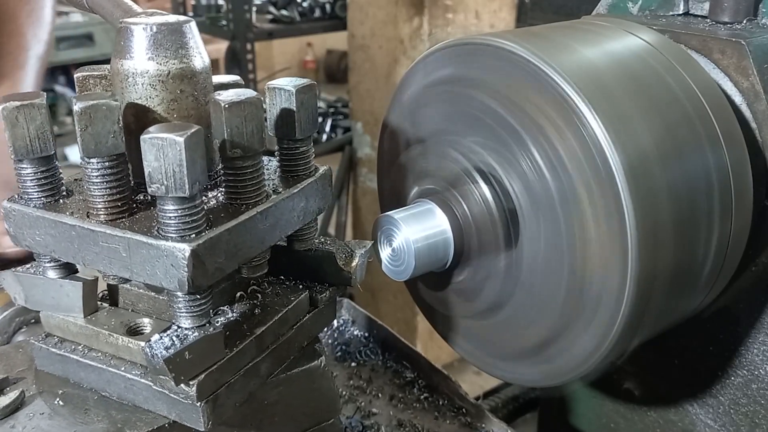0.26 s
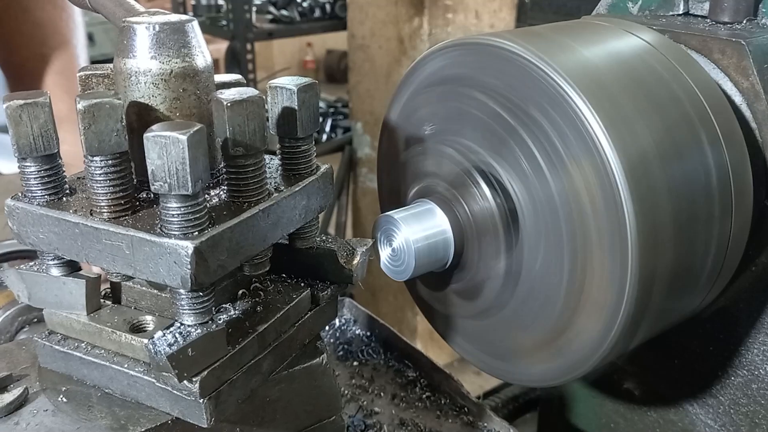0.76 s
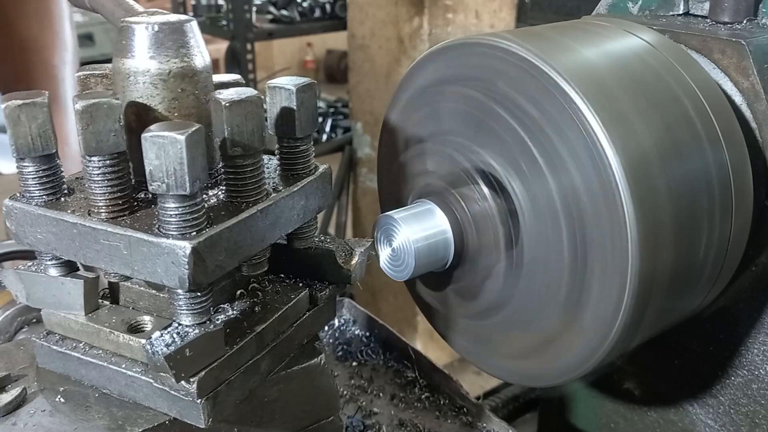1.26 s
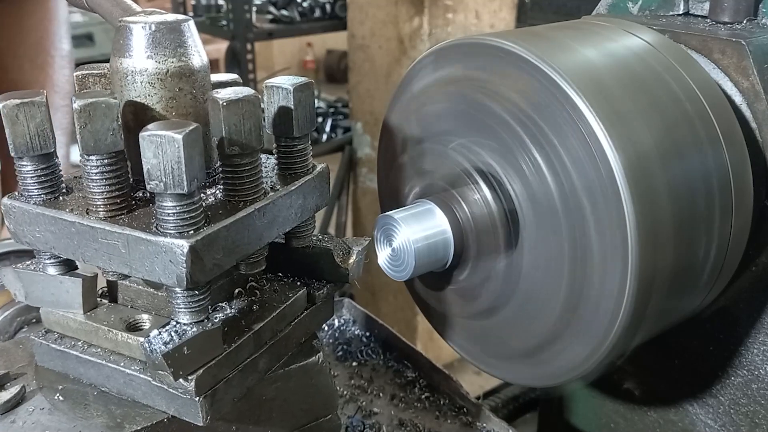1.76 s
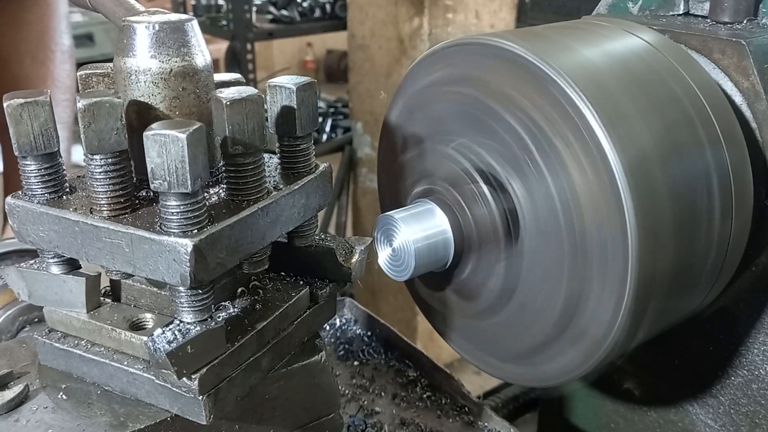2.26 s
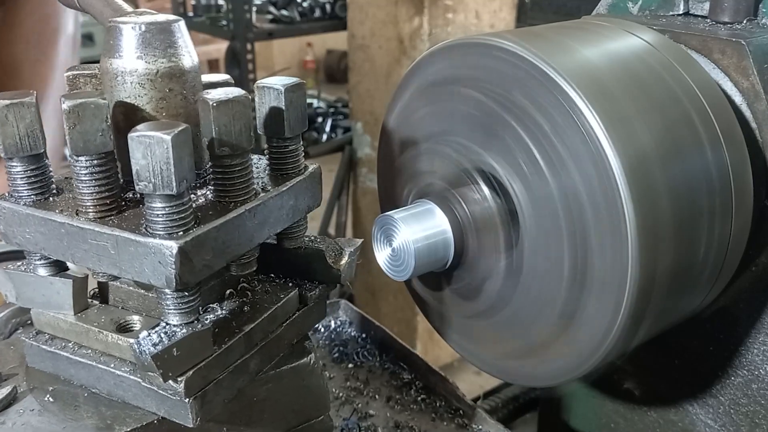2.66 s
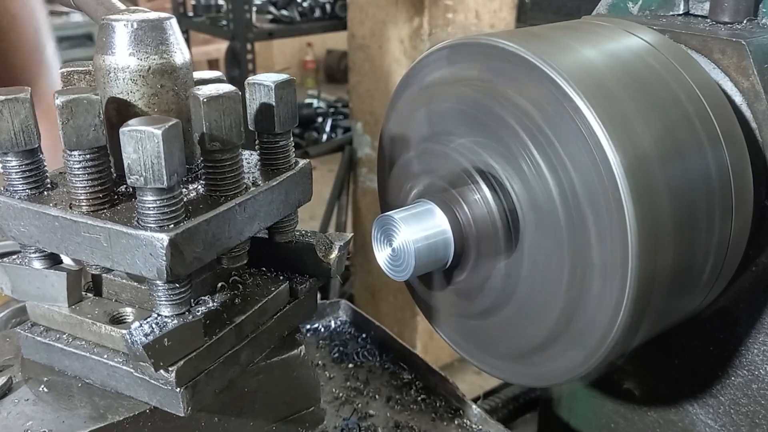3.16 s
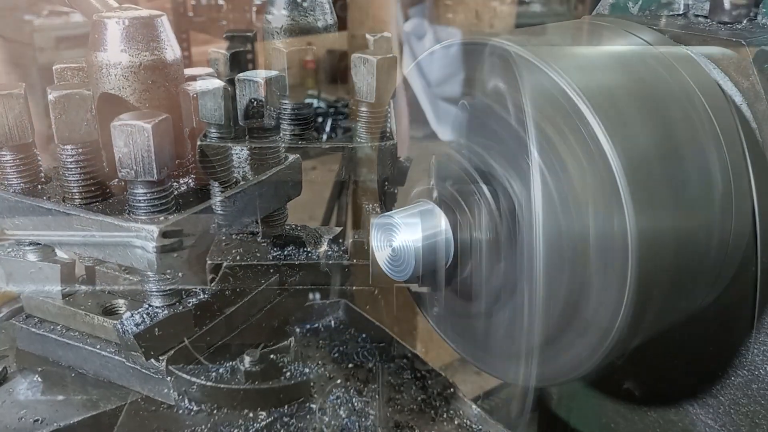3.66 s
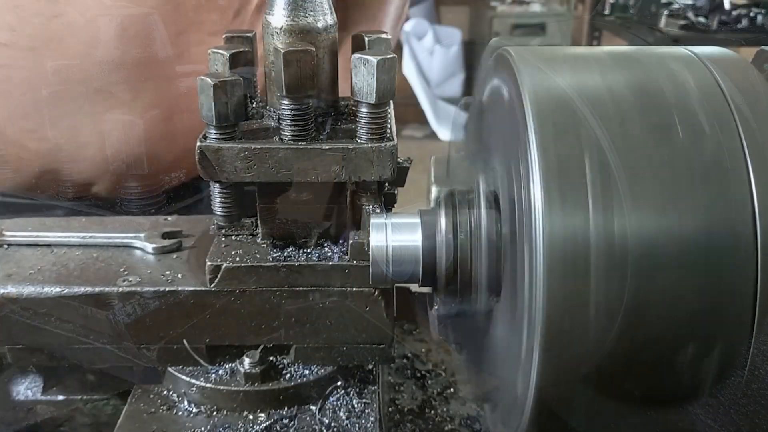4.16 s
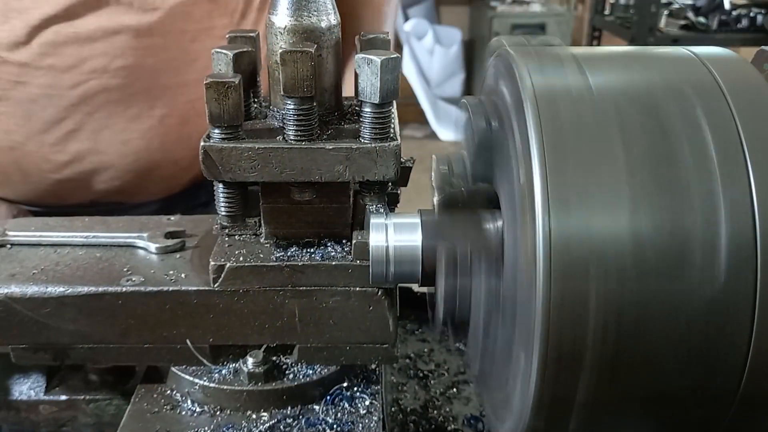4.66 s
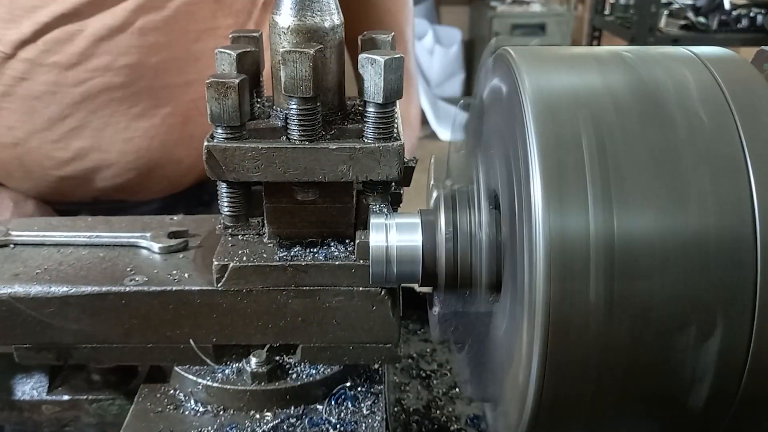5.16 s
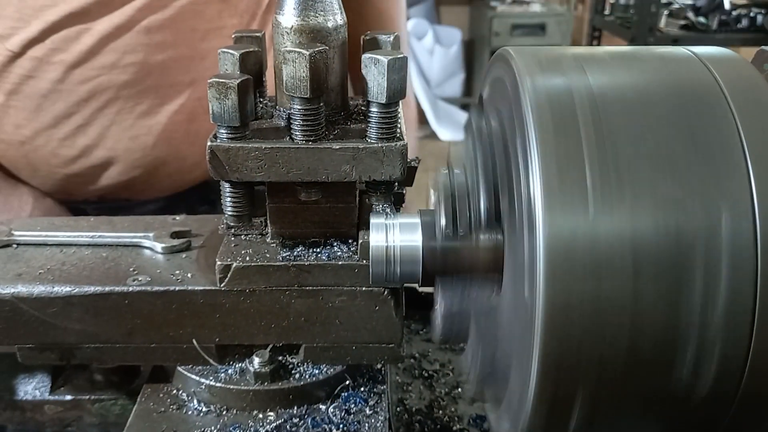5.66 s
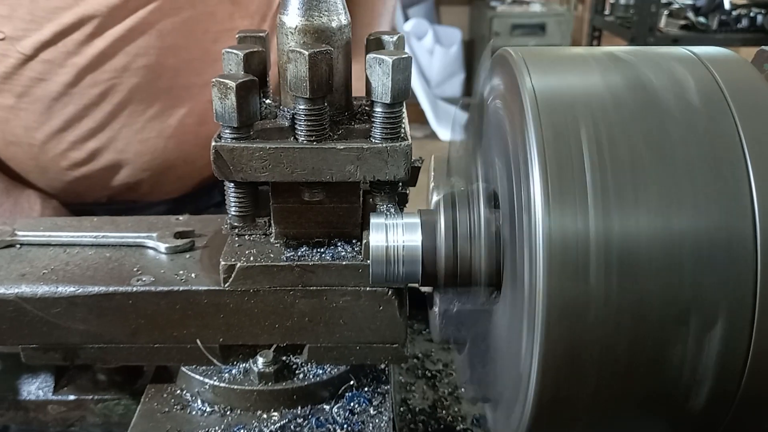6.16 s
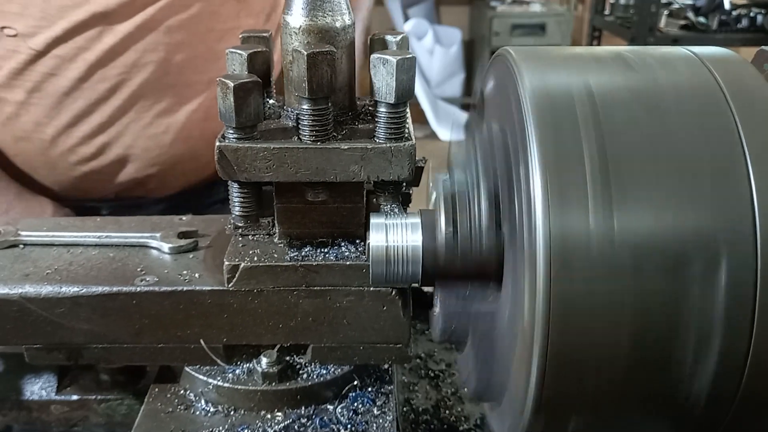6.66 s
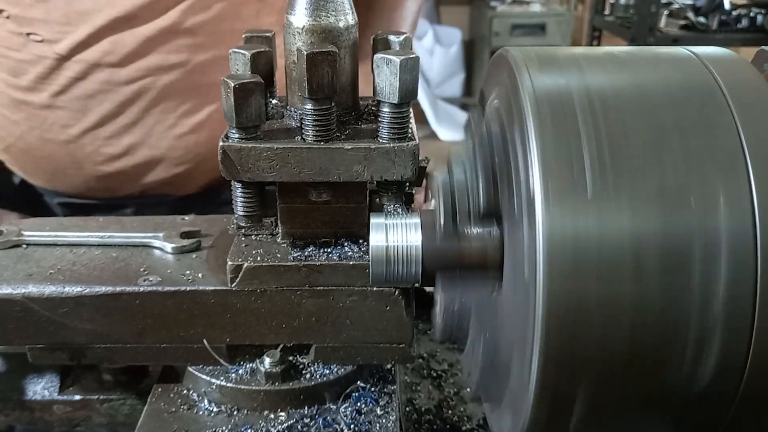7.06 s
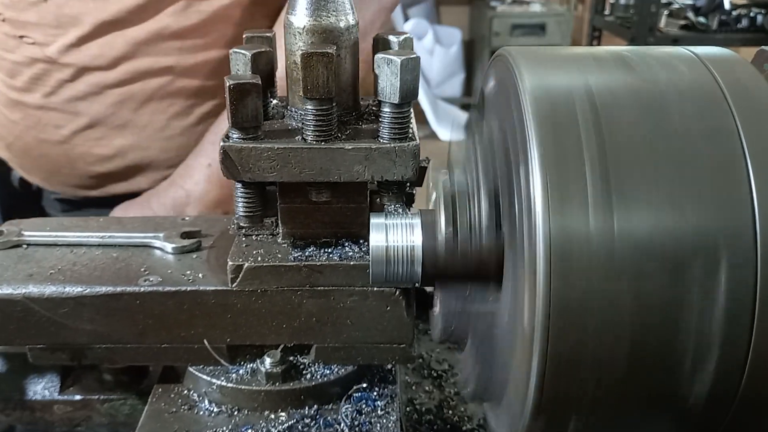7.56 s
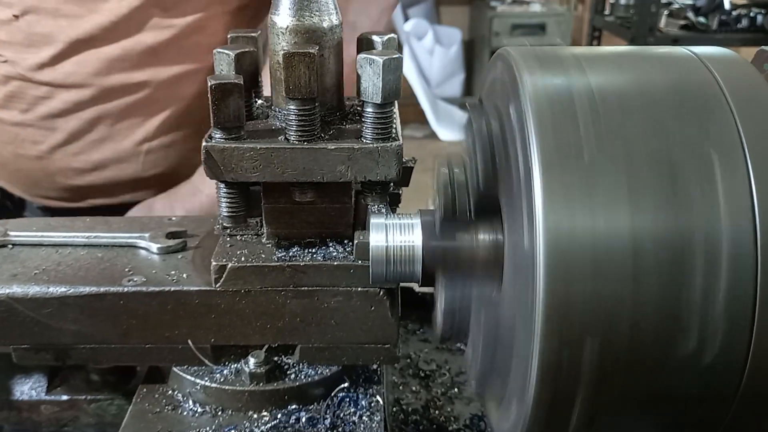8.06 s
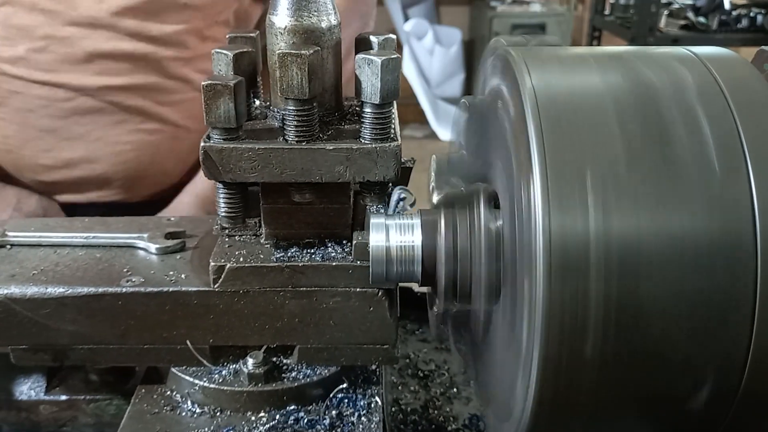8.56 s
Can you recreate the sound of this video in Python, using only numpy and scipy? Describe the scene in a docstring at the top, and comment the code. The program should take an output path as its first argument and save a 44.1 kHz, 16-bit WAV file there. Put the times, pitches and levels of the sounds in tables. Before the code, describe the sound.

From 0 to 3.8 seconds, a lathe is heard across its bed in a workshop: a steady, slightly wavering motor and gear drone, with bright squeaky chirps rising and dipping in a pattern repeating about three times a second, stronger on the left, over a faint whistle. Soft hiss fades at the start and swells around 1.2 and 2.3; small knocks fall near 0.1, 1.3, 2.6 and 3.4. At 3.8 the sound switches abruptly to beside the chuck. Over airy spindle idling and faint gear hum, the tool scrapes with a ringing, squealing chatter until 4.45, then in short bursts around 4.9, 5.4, 5.9, 6.35 and 6.75. Gusts and low puffs buffet the microphone, mainly left, until about 7.4. A longer cut at 7.1 to 7.4 has crisp chip snaps; light nicks and weak scraping follow, then strong, throbbing chatter from 8.4 to the end.

```python
"""A motor drones across a workshop while a toothed drive chirps on every lap; a far hiss comes and goes.
Then, from beside the lathe chuck, the tool is fed in and out of the turning work. It scrapes, chatters
on the marks of its last turn, and gusts of air buffet the microphone ports over the idling spindle.
Drone, hiss, idling, scrape and gusts are coloured noise; chirp, hum and chatter are noise through
resonances, partly steadied; puffs are short tones with rasp."""
import sys
import numpy as np
from scipy import signal
from scipy.io import wavfile
from scipy.ndimage import uniform_filter1d

SR = 44100
rng = np.random.default_rng(int(sys.argv[2]) if len(sys.argv) > 2 else 0)


def dump_mix(stems):
    """Bounce the given channels to the path in sys.argv[1] as a 16-bit WAV at rate SR."""
    frames = np.atleast_2d(stems).T  # one column per channel
    limited = np.clip(frames, -1, 1)  # hard clip at full scale
    pcm = np.round(limited * 32767).astype(np.int16)
    wavfile.write(sys.argv[1], SR, pcm)


N = 388080

T = np.arange(N) / SR
STEPS = np.arange(0, N + 64, 64) / SR  # times in s at which slow levels are worked out

# Likeness of the two ports beside the chuck: pitch_hz, likeness (0-1)
NEAR_LIKENESS = [(300, 0.9), (1600, 0.98), (3500, 0.43), (6000, 0.33), (11000, 0.49), (16000, .2)]
# Phase between the ports: pitch_hz, left_lead_radians
NEAR_PHASE = [(300, 0), (3190, -.3), (5000, -1.2), (6720, -2.8), (10000, -3.2), (11500, -4), (12700, -5.8),
              (16000, -6)]
# Balance between the ports: pitch_hz, left_over_right_db
NEAR_BALANCE = [(300, -1.5), (1600, -0.5), (3500, -2.5), (6000, -2), (11000, -1.5)]
# Brief touches of the tool: start_s, level_db, chatter_db
NICKS = [(7.138, -41.5, -54), (7.631, -44, -54), (7.79, -37.5, -52), (7.9259, -40, -44), (8.0286, -50, -54),
         (8.14, -49, -50), (8.356, -54, -35.5)]


def gain_of(db):
    """Amplitude factor of a level in dB."""
    return 10 ** (np.asarray(db) / 20)


def evened(x):
    """The signal brought to an RMS of 1."""
    return x / np.sqrt(np.mean(x ** 2) + 1e-20)


def read(points, hz):
    """A table over pitch, joined by straight lines on a log scale."""
    f, value = np.transpose(points)
    return np.interp(np.log(hz + 1), np.log(f + 1), value)


def curve(rows, t=T):
    """All columns of a table, joined by straight lines in time."""
    s, *columns = np.transpose(rows)
    return [np.interp(t, s, c) for c in columns]


def filled(level):
    """A slow level at every sample."""
    return np.array([np.interp(T, STEPS, row) for row in np.atleast_2d(level)])


def resonate(x, hz, width):
    """A resonance of gain 1: one complex pole; a moving pitch is shifted to zero, smoothed, shifted back."""
    r = np.exp(-np.pi * width / SR)
    if np.ndim(hz) == 0:
        return 2 * signal.lfilter([1 - r], [1, -r * np.exp(2j * np.pi * hz / SR)], x).real
    turn = np.exp(2j * np.pi * np.cumsum(hz) / SR)
    return 2 * (turn * signal.lfilter([1 - r], [1, -r], x * turn.conj())).real


def resonate_twice(x, hz, width):
    """Two equal resonances in a row, for steeper sides; width is that of each."""
    return resonate(resonate(x, hz, width), hz, width)


def steadied(x, share, size):
    """A self-sustained oscillation holds its size: part of the swelling and fading is taken out."""
    power = uniform_filter1d(x ** 2, size)
    return evened(x / (abs(power) + 0.033 * np.var(x)) ** (np.clip(share, 0, 1) / 2))


def panned(x, pan_db):
    """Left and right, with left stronger by pan_db."""
    return x * gain_of(np.array([[.5], [-.5]]) * pan_db)


def noise(colour, modes=(), modes_db=0, same=((1, 0), (2, 0)), phase=((1, 0), (2, 0)),
          balance=((1, 0), (2, 0)), patchy_db=2.5, size=2048):
    """Stereo noise from random short-time spectra: a colour, resonant humps on it, drifting patches."""
    hz = np.fft.rfftfreq(size, 1 / SR)
    a, b, c, d, patches = rng.standard_normal((4 * N // size + 5, len(hz), 5)).T
    patches = uniform_filter1d(patches, size=12, axis=0)  # over pitch
    patches = evened(uniform_filter1d(patches, size=6, axis=1))  # over time
    humps = sum(gain_of(2 * (db + modes_db)) / (1 + (2 * (hz - f) / width) ** 2) for f, width, db in modes)

    like = np.clip(read(same, hz), -1, 1)[:, None]
    right = a + 1j * b
    left = like * right + np.sqrt(1 - like ** 2) * (c + 1j * d)
    left = left * (np.exp(1j * read(phase, hz)) * gain_of(read(balance, hz)))[:, None]

    shape = gain_of(read(colour, hz)) * np.sqrt(1 + humps)
    spectra = np.array([left, right]) * shape[:, None] * gain_of(patchy_db * patches)
    sound = signal.istft(spectra, nperseg=size, noverlap=3 * size // 4)[1]
    return evened(sound[:, :N])


def bumps(rows, rise_s):
    """One rounded envelope at each (start_s, peak_db), with its peak rise_s after the start."""
    out = np.zeros((len(rows), N))
    for envelope, (s, db) in zip(out, rows):
        part = slice(int(np.ceil(s * SR)), int((s + 20 * rise_s) * SR))
        u = (T[part] - s) / rise_s
        envelope[part] = gain_of(db) * u * np.exp(1 - u)
    return out


def swell_db(start, top, end, db, rise_s, fall_s, start_db, end_db, rest_db):
    """Level in dB through five points: rest, start, top, end, rest; past the last point it is at rest."""
    times = [start - rise_s, start, top, end, end + fall_s]
    return np.interp(STEPS, times, [rest_db, db + start_db, db, db + end_db, rest_db])


def drone():
    """Motor and gears from across the bed: noise with humming casings, its bass wavering in level."""
    # Colour before levelling: pitch_hz, level_db per Hz
    drone_colour = [(25, -38), (45, -22), (60, -7.5), (100, -1.5), (170, -7), (250, -4), (500, -3.5),
                    (900, -5), (1460, -6.5), (1900, -5.5), (2500, -5.5), (3800, -8.5), (4420, -11),
                    (6720, -14.5), (7400, -28), (11700, -24.5), (16000, -29.5)]
    # Casings that hum, dB against each other: pitch_hz, width_hz, level_db
    casings = [(142.7, 6.3, -5), (204.6, 19, 0), (317.4, 7.2, 0.5), (416.4, 5.6, -0.5), (488, 16, -6),
               (764, 48, -11), (851, 16, -4.5), (1026, 20, -4), (3880, 76, -7)]
    # Likeness of left and right: pitch_hz, likeness (0-1)
    likeness = [(60, 0.82), (150, 1), (400, 0.84), (950, 0.047), (2400, 0.076), (6000, 0.23), (15000, 0.02)]
    # Slow course of the bass, on which the waver rides: time_s, change_db
    bass_course = [(0, 0.5), (.8, -2.5), (.92, 0.5), (2.0, -0.5), (2.12, 4), (2.7, 1), (3.2, -1.5),
                   (3.8, 1)]
    level_db, waver_db = -42.5, 1.3
    sound = gain_of(level_db) * noise(drone_colour, casings, 11.4, likeness, patchy_db=1.85, size=4096,
                                      balance=[(100, -1.4), (2000, -1.1), (6000, -1.0)])
    bass = signal.sosfiltfilt(signal.butter(2, 350, fs=SR, output="sos"), sound)
    waver = evened(uniform_filter1d(rng.standard_normal(N), size=3000))
    return sound + bass * (gain_of(curve(bass_course)[0] + waver_db * waver) - 1)


def toothed_drive():
    """Each tooth gives a short squeak near a pitch and level that repeat every lap, over a lower whistle."""
    # Upper chirp over one lap, before the cover colours it: time_in_lap_s, pitch_hz, level_db
    chirp_lap = [(0, 3880, -62), (.055, 3800, -57), (.075, 3800, -47.5), (.095, 3480, -43.5),
                 (.115, 3140, -49.5), (.14, 3030, -44), (.155, 3480, -54.5), (.18, 3690, -51),
                 (.205, 3430, -46.5), (.225, 3440, -74), (.25, 3800, -58), (.275, 3800, -45.5),
                 (.3, 3860, -50.5), (.3212, 3850, -57)]
    # Lower whistle over one lap: time_in_lap_s, pitch_hz, level_db
    whistle_lap = [(0, 2020, -51), (.05, 1980, -49.5), (.1, 1860, -52.5), (.17, 1860, -58),
                   (.21, 1900, -56.5), (.26, 2010, -50), (.3212, 2070, -48.5)]
    # Cover of the drive, dB against the chirp put through each: pitch_hz, width_hz, level_db
    cover = [(3060, 160, -5), (3425, 104, -2.5), (3786, 83, 3.5), (3920, 130, -4.5)]
    lap_s, teeth = .3212, 22

    hz, db = curve(chirp_lap, T % lap_s)
    tooth = T / lap_s * teeth - .3
    nearest = np.round(tooth)
    stray, strength = rng.standard_normal((2, int(N / SR * 70) + 2))[:, nearest.astype(int)]
    hz = hz * (1 + 0.02 * stray - 0.062 * (tooth - nearest))  # each squeak falls as the tooth seats
    squeaks = (0.4 + np.exp(2.1 * (np.cos(2 * np.pi * tooth) - 1))) * gain_of(0.67 * strength)

    a, b, c, d = rng.standard_normal((4, N))
    chirp = []
    for source in (a, a + 0.49 * b):  # left and right share most of it
        ringing = steadied(resonate_twice(source, hz, 410), share=0.32, size=400)
        bare = evened(ringing * squeaks) * gain_of(db)
        covered = sum(gain_of(mode_db) * resonate(bare, f, width) for f, width, mode_db in cover)
        chirp.append(.5 * bare + covered)

    hz, db = curve(whistle_lap, T % lap_s)
    whistle = [steadied(resonate_twice(source, hz, 140), share=0.45, size=600) * gain_of(db)
               for source in (c, c + 6.9 * d)]  # left and right share little of it
    return panned(np.add(chirp, whistle), -7.5)


def far_hiss():
    """Coloured noise in the distance that rises, climbs and falls away."""
    # Spells of hiss: start_s, loudest_s, fade_s, level_db
    spells = [(-.2, .04, 0.11, -42.5), (0.867, 1.18, 1.265, -42.5), (2.04, 2.32, 2.56, -43)]
    # Colour before levelling: pitch_hz, level_db per Hz
    hiss_colour = [(2000, -13.5), (4000, -4), (5200, -8), (6800, -10), (7300, -21.5), (11000, -21.5),
                   (16000, -34)]
    # Resonant humps: pitch_hz, width_hz, level_db against the colour
    hiss_modes = [(5870, 200, 9), (11250, 170, 9)]
    levels = [swell_db(*row, rise_s=0.051, fall_s=0.15, start_db=-6.5, end_db=-2.5, rest_db=-59.5)
              for row in spells]
    return filled(gain_of(np.max(levels, axis=0))) * noise(hiss_colour, hiss_modes, patchy_db=2.0, size=1024)


def knocks():
    """Small knocks: a resonant thud and a bright tick, each noise under a rounded envelope."""
    # Knocks: start_s, thud_db, tick_db
    knock_rows = [(0.127, -42.5, -62), (1.294, -40.5, -69), (2.554, -38.5, -63), (2.583, -43.5, -64),
                  (3.357, -42.5, -74)]
    s, thud_db, tick_db = np.transpose(knock_rows)
    a, b = rng.standard_normal((2, N))
    thuds = evened(resonate(a, 610, 360)) * sum(bumps(np.transpose([s, thud_db]), 0.0085))
    ticks = evened(np.diff(b, 2, prepend=[0, 0])) * sum(bumps(np.transpose([s, tick_db]), .003))
    return thuds + ticks


def idling():
    """Spindle, gears and fan close by: noise with resonant humps."""
    # Colour before levelling: pitch_hz, level_db per Hz
    idle_colour = [(18, -68), (30, -31), (199, -33.5), (426, -15.5), (666, -6), (962, -15.5), (1810, -15.5),
                   (2060, -3.5), (2350, -15.5), (5040, -13), (6900, -13.5), (14800, -17.5), (16000, -23)]
    # Resonant humps, dB against each other: pitch_hz, width_hz, level_db
    idle_modes = [(336.6, 7, 5.5), (893, 21, -4.5), (1291, 24, 4), (1490, 23, -29), (1640, 35, -24),
                  (2026, 75, -3.5), (2530, 21, 2.5), (2920, 140, 0), (3297, 55, 3.5), (4110, 26, -1),
                  (4950, 49, 1.5), (5380, 21, 5), (5710, 51, 1)]
    # The idling eases after the start and dips briefly: time_s, change_db
    idle_course = [(3.8, 4.5), (4.2, 2.5), (4.6, -0.5), (4.63, -1), (4.68, 3), (6.9, -1), (7.6, 1),
                   (8.8, 2.5)]
    base_db = -49.5
    sound = noise(idle_colour, idle_modes, 11.3, NEAR_LIKENESS, NEAR_PHASE, NEAR_BALANCE, size=4096)
    return gain_of(base_db + curve(idle_course)[0]) * sound


def gear_hum():
    """A wavering hum of the gears: noise through a narrow resonance, partly steadied."""
    # Course of the hum: time_s, level_db
    hum_course = [(3.8, -62), (4.9, -64), (5.0, -52), (5.15, -64), (5.35, -50), (5.65, -67), (5.8, -50),
                  (6.07, -59), (6.93, -60), (6.97, -63), (7.5, -58.5), (7.85, -51.5), (8.3, -50.5),
                  (8.8, -55)]
    hum = steadied(resonate_twice(rng.standard_normal(N), 647.0, 30), share=0.34, size=700)
    return panned(hum * gain_of(curve(hum_course)[0]), -0.96)


def feed(touch, full, withdraw, stops, scrape_db, chatter_db, built_db, lower_db, overtone_db):
    """Levels of scrape, chatter, lower mode, overtone: chatter goes to its built level, lower mode fades."""
    # Scrape in dB against full depth: approach, touch, built up, withdraw, lifted
    scrape_steps = (-17, -9.5, -1.5, -3, -29.5)
    approach_s, build_s, lift_s = 0.044, 0.18, 0.084
    fade_db_per_s, most_fade_db = 64, 19
    built = min(full + build_s, (full + 3 * min(withdraw, stops)) / 4)
    s = np.array([touch - approach_s, touch, full, built, withdraw, withdraw + lift_s])
    late = s + (stops - withdraw) * (s >= withdraw)  # the chatter has its own stop
    scrape = scrape_db + np.insert(np.array(scrape_steps), 2, 0)
    chatter = np.array([chatter_db - 38, chatter_db - 19.5, chatter_db, built_db, built_db, built_db - 34.5])
    lower = chatter + lower_db - np.clip(fade_db_per_s * (s - full), 0, most_fade_db)
    ringing = [np.interp(STEPS, late, db, -120, -120) for db in (chatter, lower, chatter + overtone_db)]
    return [np.interp(STEPS, s, scrape, -120, -120)] + ringing


def spindle():
    """Turns made so far, and how far the high side of the work faces the tool (-1 to 1)."""
    # Load slows the spindle: time_s, turns_per_s
    speed = [(3.8, 33.0), (4.0, 32.75), (4.4, 32.4), (4.7, 33.0), (5.05, 32.7), (5.25, 33), (5.55, 32.6),
             (5.75, 33), (7.1, 33.1), (7.4, 33), (8.35, 33), (8.55, 32.4), (8.8, 31.7)]
    high_spot_s = 8.731  # a moment when the high side meets the tool
    turns = np.cumsum(curve(speed)[0]) / SR
    return turns, np.cos(2 * np.pi * (turns - turns[round(high_spot_s * SR)]))


def tool_scrape(high_side):
    """Scrape of the tool at an even level: noise that throbs once a turn and breaks up with the chips."""
    # Colour before levelling: pitch_hz, level_db per Hz
    scrape_colour = [(290, -53), (500, -18), (631, -9.5), (750, -19), (1050, -19), (1640, -1), (1840, -9),
                     (2540, -4.5), (9220, -14), (14700, -18), (16000, -15.5)]
    # Resonances of the tool, dB against each other: pitch_hz, width_hz, level_db
    tool_modes = [(588, 51, 5), (957, 47, 7), (1178, 22, 7), (1890, 116, 0), (2300, 45, -1), (2543, 36, 0),
                  (4400, 60, -8), (5100, 97, 0), (5500, 59, -1.5), (6360, 57, 4)]
    grit = evened(uniform_filter1d(rng.standard_normal(N), size=200))  # chips break unevenly
    throb = gain_of(0.71 * high_side + 1.66 * grit)
    sound = noise(scrape_colour, tool_modes, 6.9, NEAR_LIKENESS, NEAR_PHASE, NEAR_BALANCE,
                  patchy_db=2.0, size=1024)
    return sound * evened(throb)


def surface(turns, memory, count=1400):
    """Roughness met by the tool: each turn keeps a share of the marks left by the turn before."""
    fresh = rng.standard_normal((int(N / SR * 36), count))
    marks = signal.lfilter([1], [1, -np.clip(memory, 0, .97)], fresh, axis=0).ravel()
    return evened(np.interp(turns * count, np.arange(len(marks)), marks))


def shank_chatter(turns, high_side, chatter_db, lower_db, overtone_db):
    """The marks of the last turn set the tool shank ringing in two close modes and an overtone."""
    # The work runs off centre: time_s, depth (0-1) of the throb in each turn
    runout = [(3.8, 0.1), (4.2, 0), (4.5, 0.4), (8.4, 0.08), (8.6, 0.55), (8.8, 1)]
    marks = surface(turns, memory=0.77)
    depth = np.clip(curve(runout)[0], 0, 1)
    upper = steadied(resonate_twice(marks, 1636, 34), share=.85, size=900)
    upper = upper * (1 + depth * high_side) / np.sqrt(1 + depth ** 2 / 2)
    upper = upper + 0.2 * evened(resonate(marks, 1730, 23))
    lower = steadied(resonate_twice(marks, 1515, 90), share=0.42, size=2600)
    post = evened(resonate_twice(marks, 1166, 55))  # the tool post rings along with the lower mode
    overtone = steadied(resonate_twice(marks, 3196, 150), share=0.34, size=900)
    overtone = overtone * (1 + 0.49 * depth * high_side)

    struck = sum(bumps([(s, db) for s, _, db in NICKS], 0.023))  # each nick sets the shank ringing
    chatter = (gain_of(chatter_db) + struck) * upper
    chatter = chatter + (gain_of(lower_db) + 0.42 * struck) * (lower + 0.32 * post)
    chatter = chatter + gain_of(overtone_db) * overtone
    # A faint copy 170 samples later, opposite in sign left and right, widens the chatter
    spread = 0.14 * np.roll(chatter, 170) * [[1], [-1]]
    return panned(chatter, -0.29) + spread


def tool_nicks(scrape):
    """Brief touches of the tool: the scrape through a broad resonance, under rounded envelopes."""
    return sum(bumps([row[:2] for row in NICKS], 0.0091)) * evened(resonate(scrape, 1100, 2000))


def chip_snaps(scrape):
    """Chips snap with a bright hiss: the scrape run backwards and brightened, in short bursts."""
    # Snaps: start_s, level_db
    chips = [(7.1355, -42), (7.1774, -41), (7.2353, -41), (7.3296, -42), (7.3595, -38), (7.3934, -40),
             (7.4782, -41), (8.25, -44), (8.3333, -42)]
    return sum(bumps(chips, 0.004)) * evened(np.diff(scrape[:, ::-1], prepend=0))


def cutting():
    """The tool fed in and out of the work: scrape, chatter, nicks and snapping chips."""
    # Feeds: touch_s, full_depth_s, withdraw_s, chatter_stops_s, scrape_db, chatter_db at full depth,
    # built_chatter_db, lower_mode_db and overtone_db against the chatter
    feeds = [(3.855, 4.04, 4.44, 4.455, -36.5, -39.5, -35, 1.5, -13),
             (4.73, 4.884, 5.03, 5.025, -37, -41, -41, 3.5, -14),
             (5.26, 5.38, 5.54, 5.555, -37.5, -39.5, -40.5, 2.5, -12),
             (5.76, 5.868, 5.99, 5.99, -37, -39.5, -42, 4.5, -9.5),
             (6.208, 6.34, 6.41, 6.41, -35, -37.5, -41, -4.5, -9.5),
             (6.608, 6.767, 6.81, 6.815, -38, -38, -40.5, -1.5, -12),
             (7.048, 7.135, 7.435, 7.385, -39.7, -40, -37, -1.5, -16),
             (7.46, 7.485, 7.52, 7.52, -41, -44, -47, -0.5, -12),
             (7.57, 7.803, 8.27, 8.1, -46.5, -56, -55, 4, -5),
             (8.334, 8.464, 8.85, 8.81, -37.5, -38.5, -36.5, -3, -6)]
    clear_db = -57.5  # the scrape level never goes below this, even with the tool clear
    scrape_db, *ringing_db = filled(np.max([feed(*row) for row in feeds], axis=0))
    turns, high_side = spindle()
    scrape = tool_scrape(high_side)
    chatter = shank_chatter(turns, high_side, *ringing_db)
    scraping = gain_of(np.maximum(scrape_db, clear_db)) * scrape
    return scraping + tool_nicks(scrape) + chip_snaps(scrape) + chatter


def gusts():
    """Lumpy air noise, unrelated at the two ports; gusts swell and sag, or are cut short while rising."""
    # Points of each gust's level curve before the bass cut:
    # rise_point_s, top_point_s, end_point_s, top_level_db, left_over_right_db.
    # The level is at rest from 36 ms after the end point on; where the end point lies early,
    # the gust is cut short before its top, or is not heard at all.
    gust_rows = [(3.95, 4.04, 3.9, -50, 11), (4.126, 4.148, 4.14, -50.5, 21),
                 (4.236, 4.473, 4.555, -43, 13), (4.584, 4.593, 4.6, -45, 23),
                 (4.665, 4.907, 4.935, -43.5, 10.5), (5.0, 5.11, 5.02, -54.5, 21),
                 (5.265, 5.4, 5.5, -53, 2), (5.794, 5.843, 5.7, -49.5, 12), (6.275, 6.37, 6.41, -42.5, 7),
                 (6.5, 6.862, 6.895, -47.5, 18), (7.02, 7.057, 6.9, -45.5, -5),
                 (7.11, 7.15, 7.37, -49.5, 0)]
    # Colour before levelling: pitch_hz, level_db per Hz
    gust_colour = [(60, -49), (180, -48), (280, -15.5), (400, -5), (520, 2), (800, -6.5), (1200, -12.5),
                   (2500, -39)]
    calm_db = -78
    lumps = gain_of(2.7 * evened(uniform_filter1d(rng.standard_normal((2, N)), size=350)))
    air = evened(noise(gust_colour, size=512) * lumps)
    strength = gain_of(calm_db)
    for *row, pan_db in gust_rows:
        level_db = swell_db(*row, rise_s=0.063, fall_s=0.036, start_db=-7, end_db=-1, rest_db=-100)
        strength = strength + panned(gain_of(level_db), pan_db)
    return filled(strength) * air


def puffs():
    """Sudden puffs at the ports: a short low tone with rasping noise on it."""
    # Puffs before the bass cut: start_s, level_db, pitch_hz, rasp_db against the tone, left_over_right_db
    pops = [(4.024, -41, 524, -6, 9), (4.255, -43, 522, -12, 17), (4.423, -38, 500, -13.5, 4.0),
            (4.496, -36.5, 637, -9.5, 12), (4.517, -39, 560, -10, 13), (4.532, -38, 540, -10, 13),
            (4.583, -41.5, 566, -11.5, 23), (4.778, -37.5, 553, -13.5, 14), (4.913, -43, 484, -11, 7.5),
            (5.083, -45, 600, -4, 18), (5.094, -40, 570, -7, 22), (5.114, -45, 465, -10, 20),
            (6.503, -37, 520, -12, 24.5), (6.556, -41.5, 519, -6, 18), (6.603, -39.5, 527, -17, 23),
            (6.647, -38, 514, -9, 21.5), (6.849, -39, 530, -5.5, 14.5), (6.88, -31, 508, -12.5, 19),
            (7.048, -45.5, 506.4, -10, -11), (7.444, -41.5, 500, -8, -9)]
    out = np.zeros((2, N))
    rasp = rng.standard_normal(N)
    rasp = evened(resonate(rasp, 910, 517) + 0.4 * resonate(rasp, 2300, 900))
    envelopes = bumps([row[:2] for row in pops], 0.0029)
    for (s, _, hz, rasp_db, pan_db), bump in zip(pops, envelopes):
        part = slice(int(s * SR), int((s + .06) * SR))
        tone = np.sin(2 * np.pi * hz * (T[part] - s))
        out[:, part] += panned(bump[part] * (tone + gain_of(rasp_db) * rasp[part]), pan_db)
    return out


def buffeting():
    """Gusts and puffs at the microphone, which cuts their bass below 230 Hz."""
    bass_cut = signal.butter(3, 230, "high", fs=SR, output="sos")
    return signal.sosfilt(bass_cut, gusts() + puffs())


def scene():
    """First from across the bed, then from beside the chuck."""
    move_s = 3.801  # the listening place changes, within 2 ms
    near = np.clip((T - move_s) / .002, 0, 1)
    across_the_bed = drone() + toothed_drive() + far_hiss() + knocks()
    beside_the_chuck = idling() + gear_hum() + cutting() + buffeting()
    return (1 - near) * across_the_bed + near * beside_the_chuck


def record(dry):
    """The band limit: a steep low-pass at 15800 Hz."""
    low_pass = signal.firwin(511, 15800, window=("kaiser", 9), fs=SR)
    return signal.oaconvolve(dry, low_pass[None], "same")


dry = scene()
out = record(dry)
dump_mix(out)
```